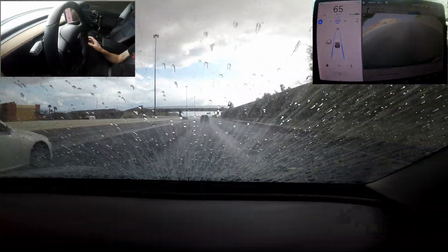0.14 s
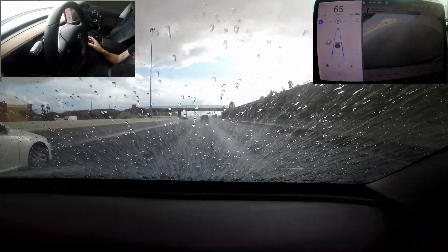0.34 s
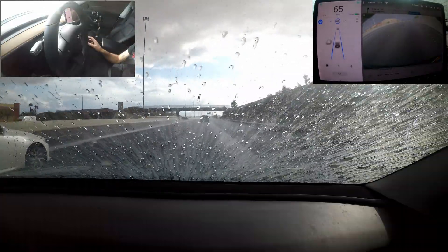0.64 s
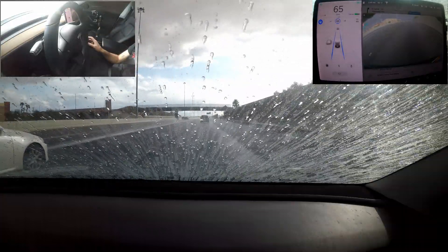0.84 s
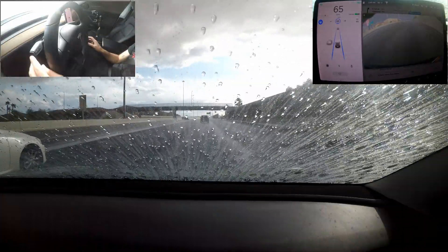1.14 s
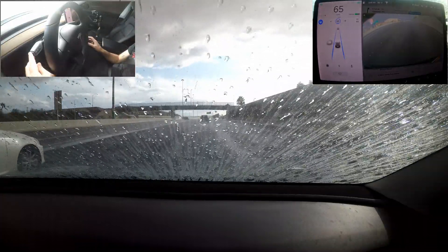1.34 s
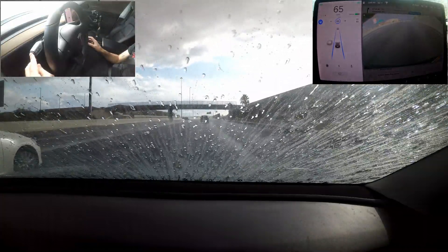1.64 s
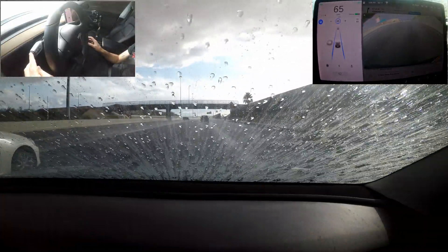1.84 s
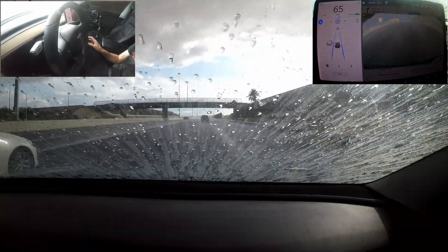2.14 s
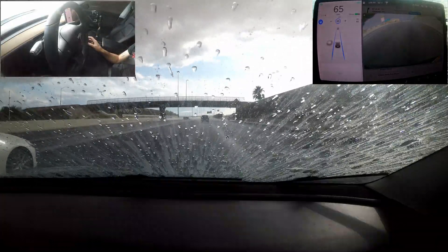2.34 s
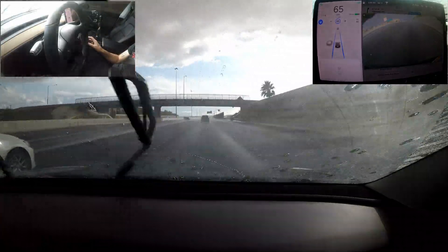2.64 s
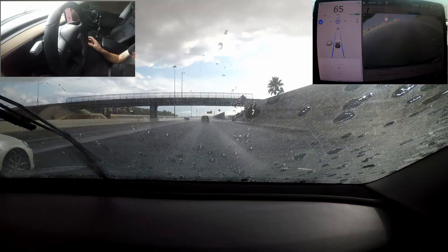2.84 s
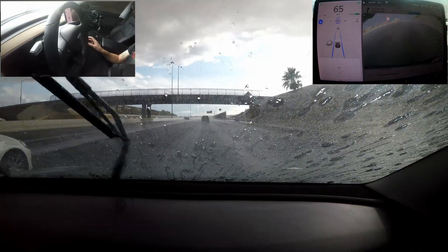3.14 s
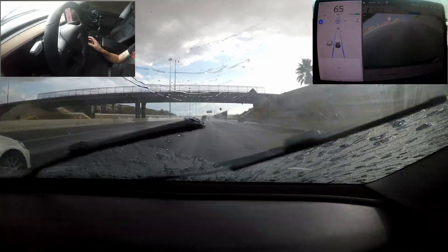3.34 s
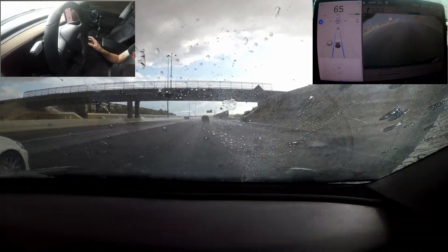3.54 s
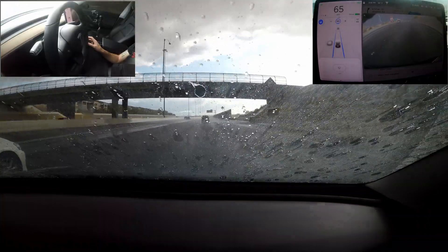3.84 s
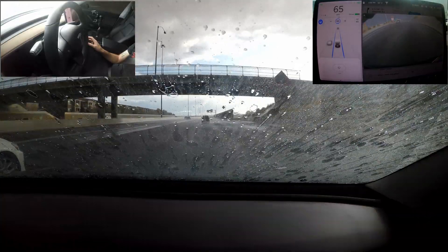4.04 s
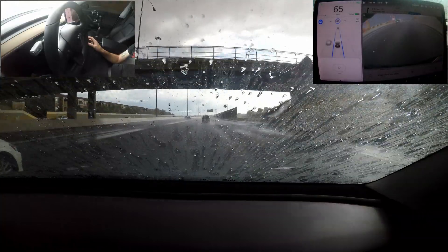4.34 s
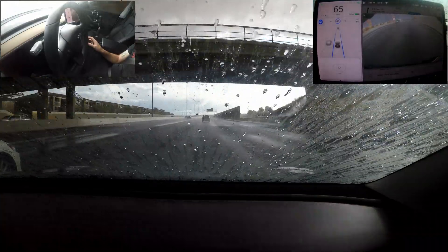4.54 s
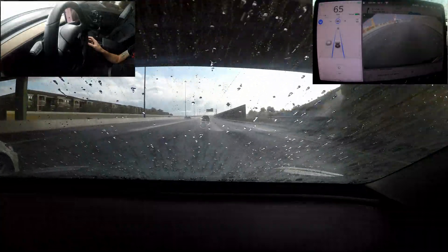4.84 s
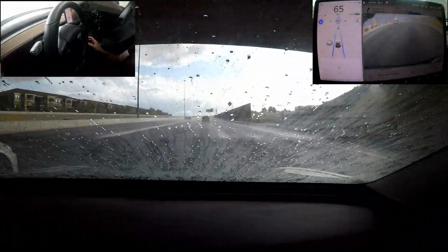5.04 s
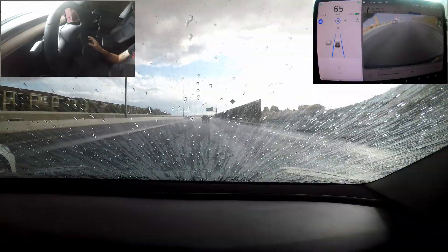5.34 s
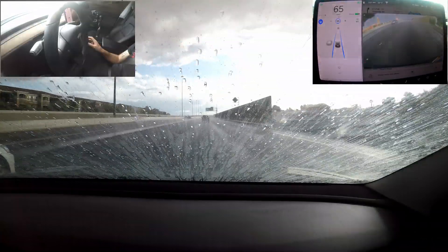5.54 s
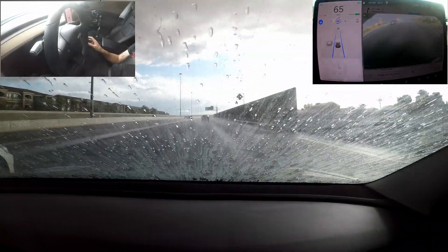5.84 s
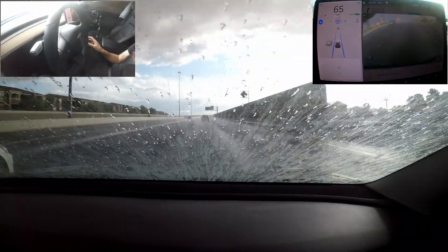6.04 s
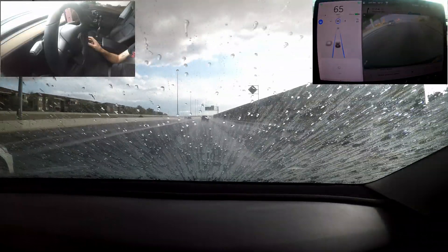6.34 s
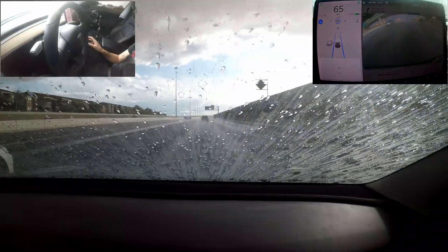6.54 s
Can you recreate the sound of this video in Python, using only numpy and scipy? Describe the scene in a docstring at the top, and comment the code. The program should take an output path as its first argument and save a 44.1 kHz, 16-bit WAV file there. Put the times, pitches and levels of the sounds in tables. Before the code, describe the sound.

Heavy rain hits a car at highway speed, heard from the dashboard inside. From the start, a dense sizzle of small drops, bright ticks and hard cracks sounds close on the windshield, with duller patter and thuds on the roof and hood. The rain surges and sags in quick sheets, and single fat drops crack on the glass. Beneath it run a steady deep road rumble, a wavering tire drone and faint wind. From about 3.2 to 3.5 seconds the wipers give one soft, low whirr. Just after 5 seconds the rain dies away under an overpass, leaving the rumble, a few stray drops and a faint reflected hiss of wet tires. At about 5.5 seconds water pouring off the bridge slaps the car, and the rain is back at once, continuing until the end at about 6.7 seconds.

```python
"""Heavy rain sizzling on the windshield, close to a microphone on the dashboard of a car at highway speed.
Thousands of drops tick on the glass and patter on roof and bonnet, over the rumble of the road below.
The wipers sweep once. An overpass shuts the rain off for a third of a second and throws back the hiss
of the wet tyres; water pouring off its far edge slaps the car, and the rain is back."""
import sys
import numpy as np
from scipy import signal
from scipy.fft import rfft, irfft
from scipy.io import wavfile
from scipy.ndimage import uniform_filter1d

SR = 44100
rng = np.random.default_rng(int(sys.argv[2]) if len(sys.argv) > 2 else 0)


def to_wav(sig):
    """Store sig (one row per channel, or 1-D mono) as 16-bit WAV at the path in sys.argv[1].

    Samples outside -1..1 are clipped; the rate is SR.
    """
    pcm = np.clip(np.atleast_2d(sig), -1, 1) * 32767
    pcm = np.round(pcm).astype(np.int16)
    wavfile.write(sys.argv[1], SR, pcm.T)  # frames by channels


N = 295143
TIME = np.arange(N) / SR
CABIN_T60_S, BAND_LIMIT_HZ = 0.08, 15600


# spectra of drops on the glass, just ahead of the microphone: f/Hz, level/dB
GLASS_SPECTRUM = [(300, -29.5), (900, -8.5), (1800, -1.5), (2400, -3.5), (3400, 1), (5200, 3), (6200, -1),
                  (7200, -9), (9000, -17), (12000, -26.5), (13500, -25), (15500, -40), (20000, -70)]
CRACK_SPECTRUM = [(1000, -13), (3000, 3), (5000, 8), (6200, 8), (7300, -1), (9000, -9), (12000, -21),
                  (13800, -21), (15500, -29), (20000, -60)]
CLICK_SPECTRUM = [(700, -14), (2000, -3), (5500, 6), (8500, 2), (12000, -3), (13800, -3), (15300, -11),
                  (20000, -45)]
# tiny bright ticks, against the rest of the rain: t/s, level/dB
TICK_LEVEL = [(0.4, -24), (2.0, -23), (3.1, -35), (4.0, -32), (4.8, -33), (5.7, -21), (6.1, -36)]

def windshield(gust):
    """Close up: a dense sizzle of small drops, sparser hard cracks, bright ticks and pitched taps."""
    sizzle = shower(1.72 * gust, per_s=2400, spread_db=2, ring_s=0.0012, cabin_db=-5.5, span=1900)
    cracks = shower(gust, per_s=170, spread_db=3, ring_s=0.002, cabin_db=-9)
    ticks = shower(0.5 * gust, per_s=110, spread_db=3.5, ring_s=0.0005, cabin_db=-3, spots=8)
    return (amp(-1) * unit(colour(sizzle, GLASS_SPECTRUM))
            + amp(-4) * unit(colour(cracks, CRACK_SPECTRUM))
            + level(TICK_LEVEL) * unit(colour(ticks, CLICK_SPECTRUM))
            + amp(-10.5) * glass_taps())


def glass_taps(per_s=70, low_hz=1101, high_hz=1802, t60_s=0.058, spots=24):
    """Some drops make the glass ring briefly, each spot at a pitch of its own."""
    t = np.arange(SR // 8) / SR
    sizes = amp(3.8 * np.minimum(rng.exponential(1, N), 2.5))
    drops = sizes * arrivals(per_s)
    spot = rng.integers(0, spots, N)
    decay = amp(-60 * t / t60_s)
    rings = [np.sin(2 * np.pi * hz * t) * decay for hz in np.geomspace(low_hz, high_hz, spots)]
    return unit(sum(signal.oaconvolve(drops * (spot == k), ring)[:N] for k, ring in enumerate(rings)))


# spectra of taps and thuds on the bodywork, heard from inside: f/Hz, level/dB
PANEL_SPECTRUM = [(150, -31), (300, 0.5), (450, 2), (620, -3), (780, 0), (1000, -1.5), (1280, 0),
                  (1520, -1.5), (1850, -3), (2300, -8.5), (4000, -13.5), (9000, -49)]
THUD_SPECTRUM = [(110, -35.5), (240, -3), (420, -1), (540, 2), (750, -10), (2000, -31)]

def panels(gust):
    """Farther off, on roof and bonnet: duller, longer taps and the thuds of heavy drops."""
    taps = shower(2 * gust, per_s=1600, spread_db=3.5, ring_s=0.0038, cabin_db=-5, span=1900)
    thuds = shower(1.4 * gust, per_s=110, spread_db=6.5, ring_s=0.0046, cabin_db=-10, spots=12)
    return amp(0.95) * unit(colour(taps, PANEL_SPECTRUM)) + amp(-7) * unit(colour(thuds, THUD_SPECTRUM))


def shower(surge_db, per_s, spread_db, ring_s, cabin_db, spots=32, span=2600):
    """Drops of many sizes land on many spots, harder during a surge."""
    sizes = amp(spread_db * np.minimum(rng.exponential(1, N), 3.4) + surge_db)
    drops = sizes * arrivals(per_s)
    flux = uniform_filter1d(drops ** 2, size=span, mode="wrap").clip(1e-4)
    drops /= np.sqrt(flux)  # the water flux evens out over `span` samples
    spot = rng.integers(0, spots, N)
    return sum(signal.oaconvolve(drops * (spot == k), impact(ring_s, cabin_db))[:N]
               for k in range(spots))


def impact(ring_s, cabin_db, size=3072):
    """One spot struck: a short scatter of bending waves, then the cabin's quick reflections."""
    t = np.arange(size) / SR
    waves, echoes = rng.standard_normal((2, size))
    decay_s = ring_s * rng.uniform(0.51, 0.83)
    direct = unit(waves * np.exp(-t / decay_s))
    tail = unit(echoes * amp(-60 * t / CABIN_T60_S) * (1 - np.exp(-t / 0.002)))
    return unit(direct + amp(cabin_db) * tail)


def gusts(per_s=55, fade_s=0.0028, limit=2.4):
    """Quick surges of drops slap the car and die away, on glass and body together."""
    slaps = rng.uniform(0.97, 1, N) * arrivals(per_s)
    spray = signal.lfilter([1], [1, -np.exp(-1 / (fade_s * SR))], slaps)
    return limit * np.tanh(unit(spray - spray.mean()) / limit)


# thick sheets of spray on the car: start t/s, length/s, swell on glass/dB, swell on body/dB
SPRAY_SHEETS = [(0.183, 0.011, 3, 9.5), (0.3, 0.055, 1, 2.5), (0.442, 0.083, 2, 2.5),
                (0.655, 0.061, 3, 2.5), (0.761, 0.047, 1, 4), (0.87, 0.015, 1, 6), (1.228, 0.067, 2, 3.5),
                (1.325, 0.027, 4.5, 5), (1.422, 0.032, 4, -1), (1.614, 0.04, 1.5, 0.5),
                (1.74, 0.056, 2, 0.5), (1.809, 0.014, 6.5, 3.5), (2.062, 0.023, 3.5, 1),
                (2.266, 0.078, 5, 3), (2.445, 0.066, 1.5, -1), (2.842, 0.032, 4, 1),
                (3.031, 0.021, 1.5, 1.5), (3.052, 0.026, 4, 5), (3.132, 0.043, 2, 1.5),
                (3.207, 0.025, 3.5, 0.5), (3.66, 0.028, 1, 1), (3.746, 0.014, 3, 3), (3.84, 0.05, 1, 4),
                (3.915, 0.06, 1, 3.5), (4.03, 0.019, 3.5, 4), (4.08, 0.019, 3, 4), (4.163, 0.045, 3.5, 1.5),
                (4.483, 0.025, 0.5, 4), (4.59, 0.017, -3, 1.5), (4.652, 0.037, 2.5, 3),
                (4.747, 0.013, 5, 6.5), (4.785, 0.016, 1.5, 6), (4.849, 0.013, 2.5, 4), (4.89, 0.028, 2, 2),
                (4.994, 0.042, 2, 2.5), (5.484, 0.014, 3.5, 4), (5.538, 0.044, 2.5, 2),
                (5.603, 0.015, 0, 4.5), (5.748, 0.027, 2, 3), (5.845, 0.03, 2, 1.5),
                (5.982, 0.061, 3, -1.5), (6.133, 0.071, 0.5, 3), (6.275, 0.032, 1.5, 1.5)]

def sheets(attack_s=0.0045, release_s=0.0045):
    """Each sheet lands at once, holds and drains away: gains for the glass and for the body."""
    swell_db = np.zeros((2, N))
    t = np.arange(SR // 2) / SR
    for start, length, glass_db, body_db in SPRAY_SHEETS:
        slap = np.minimum(t / attack_s, 1) * np.exp(-np.maximum(t - length, 0) / release_s)
        add(swell_db[0], start, glass_db * slap)
        add(swell_db[1], start, body_db * slap)
    return amp(swell_db)


# underlying strength of the rain outside: t/s, level/dB
RAIN_LEVEL = [(0, -30.5), (1.0, -30), (1.8, -28.5), (2.1, -29), (2.4, -29.5), (2.7, -30.5), (3.6, -28),
              (5.0, -29.5), (5.55, -27.5), (6.0, -28.5), (6.5, -27.5), (6.69, -32.5)]
# thin gaps in the rain: middle t/s, length/s, dip/dB
RAIN_LULLS = [(0.546, 0.046, -6.5), (0.728, 0.078, -6), (1.057, 0.042, -5.5), (1.377, 0.026, -1.5),
              (1.49, 0.095, -3.5), (2.242, 0.084, -3), (3.108, 0.033, -2.5), (3.253, 0.026, -5),
              (3.505, 0.036, -4), (3.808, 0.046, -3.5), (3.913, 0.021, -7), (3.997, 0.066, -5),
              (4.466, 0.045, -7), (4.835, 0.049, -3.5), (5.902, 0.037, -7.5), (5.98, 0.019, -10),
              (6.098, 0.11, -5.5)]

def rain_strength(flutter_db=0.88, flutter_hz=29.6):
    """The downpour sags in each lull and flutters at random."""
    dips_db = sum(db * np.cos(np.pi * np.clip((TIME - middle) / length, -0.5, 0.5)) ** 2
                  for middle, length, db in RAIN_LULLS)
    return level(RAIN_LEVEL) * amp(dips_db + flutter_db * waver(flutter_hz))


# fat drops on the glass, close to the microphone: t/s, peak level/dB, treble edge f/Hz
FAT_DROPS = [(0.1820, -8, 8000), (0.422, -18, 9000), (0.5087, -11, 9000), (1.3862, -13, 8000),
             (1.7426, -16, 8000), (1.785, -13, 12000), (2.061, -12, 9000), (2.271, -14.5, 12000),
             (2.4723, -10, 8000), (2.5515, -14, 9000), (2.7869, -16, 9000), (3.044, -15, 8000),
             (3.0662, -11, 9000), (3.2702, -9, 11000), (3.4273, -11, 11000), (3.5663, -9.5, 9000),
             (3.671, -14, 9000), (3.7468, -12, 11000), (3.929, -10, 12000), (3.9742, -12, 6500),
             (4.1595, -11, 12000), (4.234, -11, 13000), (4.4835, -11.5, 8000), (4.595, -11, 6000),
             (4.661, -13, 12000), (4.8928, -13, 9000), (4.9975, -15, 9000), (5.022, -11, 11000),
             (5.1074, -17, 8000), (5.112, -21, 6000), (5.123, -28, 5000), (5.197, -35, 4500),
             (5.204, -29, 4000), (5.4733, -28, 7040), (5.7121, -11, 9000), (6.1716, -16, 9000),
             (6.3073, -11, 8000)]

def fat_drops():
    """Single fat drops crack on the glass and thump it a little."""
    out = np.zeros(N)
    for start, db, edge_hz in FAT_DROPS:
        blow = signal.lfilter(*signal.butter(2, edge_hz, fs=SR), impact(ring_s=0.0021, cabin_db=-6))
        hit = (unit(colour(blow, GLASS_SPECTRUM))
               + amp(-2.5) * unit(colour(blow, PANEL_SPECTRUM))
               + amp(-31) * unit(colour(blow, CLICK_SPECTRUM)))
        add(out, start, amp(db) * hit / abs(hit).max())
    return out


# small fast drops, just as close: t/s, peak level/dB
FAST_DROPS = [(0.1275, -18), (0.249, -19), (0.2615, -20), (0.3785, -22), (0.454, -21), (0.474, -17),
              (0.662, -20), (1.238, -22), (1.4305, -19), (3.1173, -22), (3.235, -20), (4.350, -23),
              (4.631, -19), (4.646, -19), (4.676, -20), (5.632, -20), (5.686, -24), (5.820, -23)]

def fast_drops():
    """Small fast drops burst on the glass with a short, bright spit."""
    out = np.zeros(N)
    for start, db in FAST_DROPS:
        spit = colour(impact(ring_s=0.00049, cabin_db=-5), CLICK_SPECTRUM)
        add(out, start, amp(db) * spit / abs(spit).max())
    return out


ENTER_S, LEAVE_S = 5.042, 5.469  # the windshield is under the overpass

def overpass(lag_s, fade_db_per_s=300, return_db_per_s=1400):
    """Gain of the rain: it dies away under the bridge and is back at once on leaving."""
    fade_db = np.maximum(TIME - ENTER_S - lag_s, 0) * fade_db_per_s
    return_db = np.maximum(LEAVE_S - TIME, 0) * return_db_per_s
    return amp(-np.minimum(fade_db, return_db))


# spectrum of water pouring off the bridge's far edge: f/Hz, level/dB
SPLASH_SPECTRUM = [(400, -30), (800, 6.5), (1600, -11), (2500, 0), (3500, 2), (5500, -14), (7500, -20),
                   (11000, -22), (16000, -34)]

def runoff(gust, near_db_per_s=112, slap_db_per_s=1400, hold_s=0.069, fade_db_per_s=50):
    """A curtain of water splashes ahead, draws near, then slaps the car as it leaves the overpass."""
    drops = shower(0.5 * gust, per_s=3000, spread_db=2, ring_s=0.0015, cabin_db=-3, spots=12, span=900)
    since_exit = TIME - LEAVE_S
    ahead_db = -19 + since_exit * near_db_per_s
    rise_db = np.maximum(ahead_db, since_exit * slap_db_per_s)
    fall_db = (hold_s - since_exit) * fade_db_per_s
    envelope_db = np.minimum(rise_db, fall_db).clip(max=0)
    return amp(-27.5 + envelope_db) * unit(colour(drops, SPLASH_SPECTRUM))


# wiper blades, just across the glass from the microphone: t/s, level/dB
WIPER_LEVEL = [(2.4, -43), (3.15, -36), (3.28, -21), (3.48, -21.5), (3.58, -42)]

def wipers():
    """Blades on wet glass: a soft whirr, strongest as they come back down."""
    whirr = noise([(220, -29), (345, -1.5), (420, 3), (500, -19), (700, -47), (3000, -70)])
    return level(WIPER_LEVEL) * whirr


# the body's rumble, all around the microphone: t/s, level/dB
RUMBLE_LEVEL = [(0.1, -10.5), (0.5, -12.5), (1.4, -14.8), (2.7, -14.5), (3.6, -15.5), (4.7, -13.5),
                (6.69, -15)]
# its spectrum: f/Hz, level/dB
RUMBLE_SPECTRUM = [(8, -36), (18, -7.5), (27, -0.5), (34, -7), (43, 1.5), (52, -6.5), (62, -10), (85, -18),
                   (160, -81)]

def body_rumble():
    """The road shakes the car's body in the deep bass."""
    return level(RUMBLE_LEVEL) * noise(RUMBLE_SPECTRUM)


# coarseness of the pavement below: t/s, drone level/dB, roar level/dB
PAVEMENT = [(0.4, -20.5, -27), (0.8, -22.5, -24), (1.3, -16.5, -23.7), (1.6, -15.5, -26.5),
            (1.95, -21.5, -25), (2.25, -17.5, -24), (3.3, -19, -25), (4.2, -19.5, -23), (5.0, -19, -25),
            (5.7, -19.5, -26), (6.69, -19, -26)]
# spectra of the tyres, heard from inside: f/Hz, level/dB
DRONE_SPECTRUM = [(40, -25), (62, -8), (82, -4.5), (99, 2.5), (118, -3.5), (165, -8.5), (210, -19.5),
                  (300, -31), (600, -94)]
ROAR_SPECTRUM = [(120, -15), (210, -3.5), (290, -4), (350, 1), (405, 1.5), (440, 0.5), (495, -1.5),
                 (600, -17), (900, -30), (2000, -70)]

def tyres(patch_db=1.32, patch_hz=12):
    """Rolling tyres give a low drone and a roar that wavers with patches in the pavement."""
    drone = level(PAVEMENT, column=1) * noise(DRONE_SPECTRUM)
    patches = amp(patch_db * waver(patch_hz))
    roar = level(PAVEMENT, column=2) * patches * noise(ROAR_SPECTRUM)
    return drone + roar


# boom in the cabin: t/s, level/dB
BOOM_LEVEL = [(0.2, -36), (0.9, -36.5), (1.9, -25.5), (2.8, -33), (4.6, -33), (5.5, -26.5), (6.69, -28.5)]
# its two resonances: f/Hz, level/dB
BOOM_SPECTRUM = [(135, -33), (165, -0.5), (200, -13.5), (230, -10), (245, -1), (262, -4.5), (310, -42)]

def cabin_boom():
    """Some stretches of pavement, as beyond the bridge, excite the cabin's resonances more."""
    return level(BOOM_LEVEL) * noise(BOOM_SPECTRUM)


# spectrum of the wind outside the cabin: f/Hz, level/dB
WIND_SPECTRUM = [(300, -12), (700, 0), (1200, 0), (1850, -6), (2150, -12), (2800, -15), (3700, -24),
                 (5500, -28), (7200, -36), (9500, -28), (11000, -35), (13000, -44), (15000, -56)]

def wind():
    """Air rushes steadily past the car."""
    return amp(-36.5) * noise(WIND_SPECTRUM)


# tyre hiss off the bridge overhead: t/s, level/dB
ECHO_LEVEL = [(4.95, -65), (5.15, -42), (5.44, -43), (5.6, -65)]
# its spectrum: f/Hz, level/dB
ECHO_SPECTRUM = [(400, -4), (900, 5), (1800, -2), (2400, -10), (4000, -29), (7000, -45)]

def bridge_echo():
    """A faint hiss swells while the bridge throws back the sound of the wet tyres."""
    return level(ECHO_LEVEL) * noise(ECHO_SPECTRUM)


def amp(db):
    """Decibels to gain."""
    return 10 ** (np.asarray(db) / 20)


def unit(x):
    """Scales to rms 1."""
    return x / np.sqrt(np.mean(x ** 2) + 1e-20)


def arrivals(per_s):
    """Marks random samples, per_s a second on average."""
    return rng.random(N) < per_s / SR


def level(rows, column=1):
    """One dB column of a curve as a gain for every sample."""
    rows = np.asarray(rows)
    return amp(np.interp(TIME, rows[:, 0], rows[:, column]))


def bin_gains(points, size):
    """An (f/Hz, level/dB) spectrum as gains on FFT bins, silent above its last point."""
    hz, db = np.transpose(points)
    bin_hz = np.fft.rfftfreq(size, 1 / SR)
    return amp(np.interp(np.log(bin_hz + 1), np.log(hz), db, right=-110))


def noise(points):
    """Steady noise with a given spectrum, rms 1."""
    return unit(irfft(rfft(rng.standard_normal(N)) * bin_gains(points, N), N))


def waver(hz):
    """Random unevenness around a given rate, rms 1."""
    ratio = np.fft.rfftfreq(N, 1 / SR) / hz
    return unit(irfft(rfft(rng.standard_normal(N)) * ratio * np.exp(-ratio ** 2), N))


def colour(x, points, size=2048):
    """Minimum-phase filter, so that attacks stay sharp."""
    log_gain = np.log(bin_gains(points, size))
    mirrored = np.concatenate([log_gain, log_gain[-2:0:-1]])
    response = np.exp(np.conj(signal.hilbert(mirrored)))
    return signal.oaconvolve(x, np.fft.ifft(response).real)[:len(x)]


def add(mix, start_s, sound):
    """Mixes a sound in at start_s."""
    part = mix[round(start_s * SR):][:len(sound)]
    part += sound[:len(part)]


def bass_limiter(x, below_hz=70, limit_db=-16, squeeze=0.35):
    """The recorder holds down the biggest swells of rumble."""
    bass = signal.sosfiltfilt(signal.butter(4, below_hz, fs=SR, output="sos"), x)
    bass_db = 10 * np.log10(uniform_filter1d(bass ** 2, size=2200).clip(1e-9))
    over_db = uniform_filter1d(np.maximum(bass_db - limit_db, 0), size=1000)
    return x + bass * (amp(-squeeze * over_db) - 1)


def scene():
    """Everything as it reaches one microphone on the dashboard."""
    gust = gusts()
    glass_swell, body_swell = sheets()
    strength = rain_strength()
    glass = overpass(lag_s=0) * glass_swell * windshield(gust)
    body = overpass(lag_s=0.036) * body_swell * panels(gust)  # the roof finds shelter just after
    water = strength * (glass + body) + runoff(gust) + fat_drops() + fast_drops()
    road = body_rumble() + tyres() + cabin_boom()
    return (water + road + wind() + bridge_echo() + wipers())[None]


def record(dry):
    """The recorder limits the bass, rounds off peaks and cuts the highest treble."""
    x = bass_limiter(dry)
    knee, headroom = 0.58, 0.3
    excess = np.maximum(abs(x) - knee, 0)
    rounded = np.sign(x) * (np.minimum(abs(x), knee) + headroom * np.tanh(excess / headroom))
    lowpass = signal.firwin(511, BAND_LIMIT_HZ, window=("kaiser", 9), fs=SR)
    return signal.oaconvolve(rounded, lowpass[None], "same")


dry = scene()
out = record(dry)
to_wav(out)
```